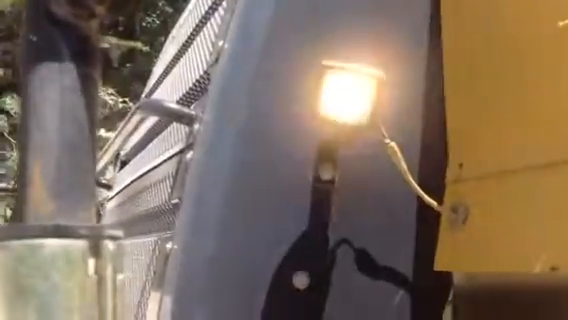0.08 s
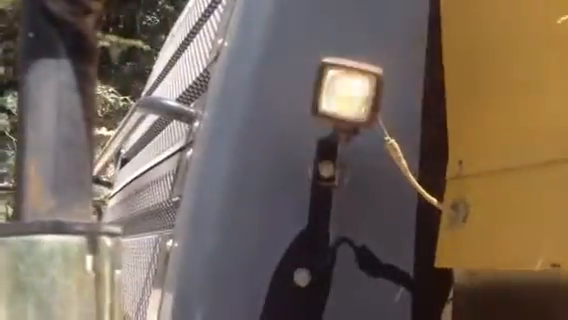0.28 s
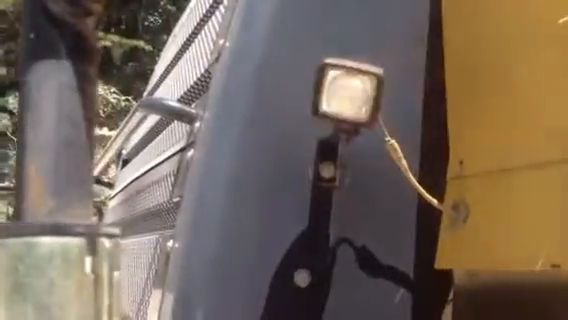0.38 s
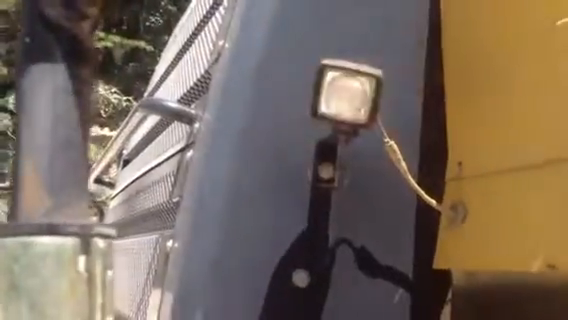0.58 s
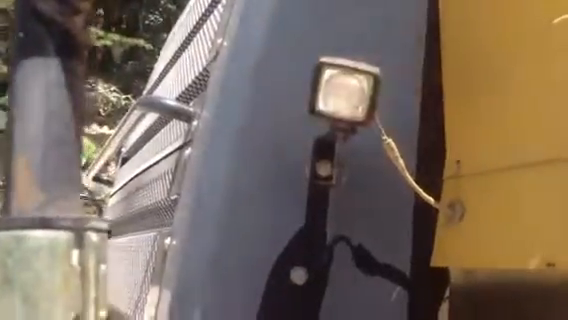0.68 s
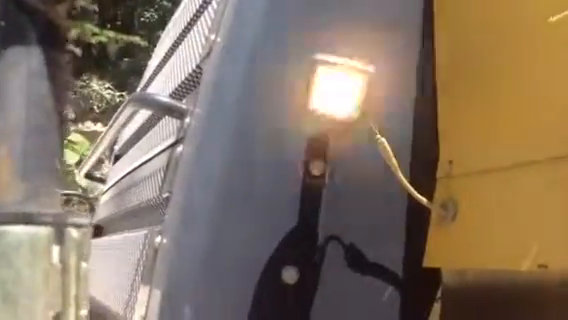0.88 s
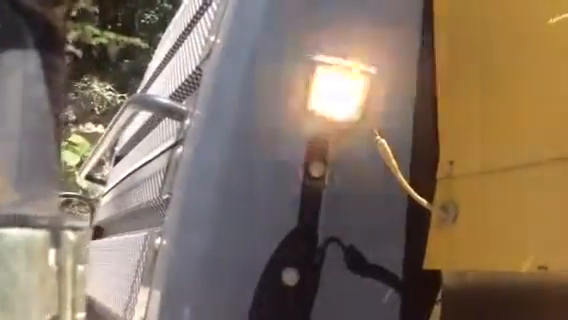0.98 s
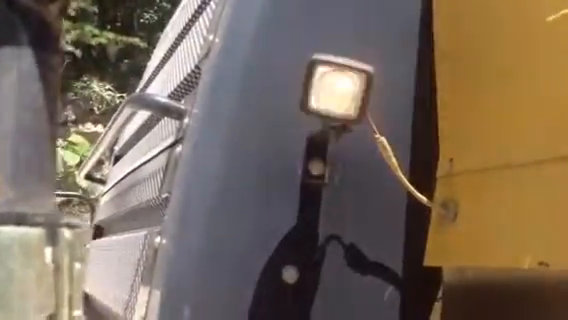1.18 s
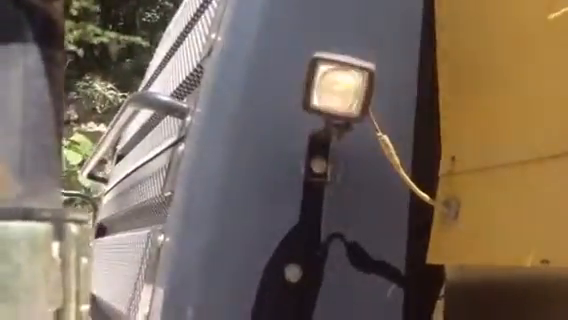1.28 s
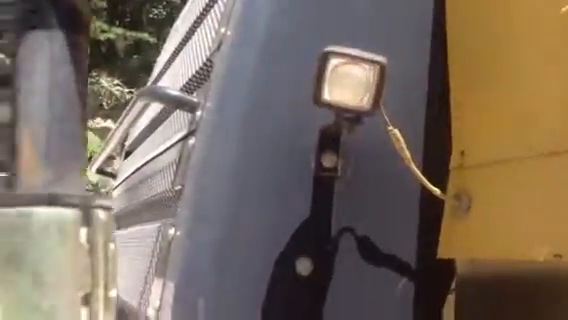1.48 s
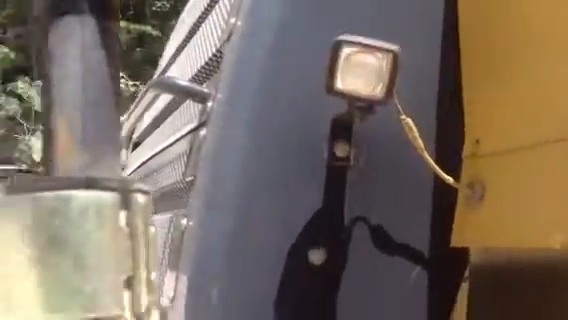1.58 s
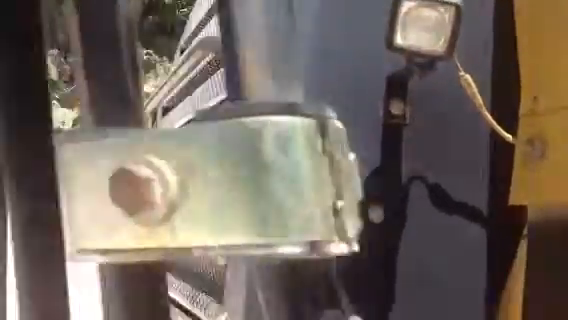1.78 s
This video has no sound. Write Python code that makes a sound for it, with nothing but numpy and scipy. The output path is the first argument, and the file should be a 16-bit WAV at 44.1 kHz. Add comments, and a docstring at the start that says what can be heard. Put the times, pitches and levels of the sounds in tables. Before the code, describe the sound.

Three sharp metallic clacks ring through a truck's steelwork outdoors, followed by soft shoe scuffs

```python
"""Three sharp metallic clacks ring in the steelwork of a big parked truck: its work lamp goes off, on and off.
Each is a noise snap, ringing panels (fading bands of noise), steel modes (fading sines) and a short echo.
Shoes shift softly on the steel steps, mostly afterwards: noise rustle and scuffs, short sines for creak and bumps.
Outdoors, shaped noise gives hissing insects over a low distant rumble; at first a nearer insect rasps
in short bursts of hissing noise with a slight flutter."""
import sys
import numpy as np
from scipy import signal
from scipy.fft import rfft, irfft
from scipy.io import wavfile

SR = 44100
rng = np.random.default_rng(int(sys.argv[2]) if len(sys.argv) > 2 else 0)


def unload_audio(sound):
    """Save the sound as a 16-bit wav file, at the path given as the first command line argument."""
    columns = np.transpose(np.atleast_2d(sound))
    # keep every value between -1 and 1, then stretch to whole-number steps
    steps = np.round(np.clip(columns, -1, 1) * 32767)
    wavfile.write(sys.argv[1], SR, steps.astype(np.int16))


N = 79380
T = np.arange(N) / SR
FREQS = np.maximum(np.fft.rfftfreq(N, 1 / SR), 1)  # kept above 0 so its logarithm exists


def undb(db):
    """Turn decibels into gain."""
    return 10 ** (np.asarray(db) / 20)


def unit(x):
    """Scale to rms 1."""
    return x / np.std(x)


def curve(points):
    """Join (frequency [Hz], value) points by straight lines on a log-frequency axis."""
    hz, value = np.array(points, float).T
    return np.interp(np.log(FREQS), np.log(np.sort(hz)), value)


def tint(x, db):
    """Boost or cut each frequency of a sound by the given decibels."""
    return irfft(rfft(x) * undb(db), N)


def noise(db):
    """Make noise of rms 1 with the given spectrum."""
    return unit(tint(rng.standard_normal(N), db))


def fade(age, t60):
    """Die away by 60 dB in t60 seconds."""
    return np.exp(-np.log(1000) * np.maximum(age, 0) / t60)


def rise(age, length):
    """Ramp from 0 to 1 over the given length."""
    return np.clip(age / length, 0, 1)


# spectrum of the distant rumble and insect chorus: (frequency [Hz], relative level [dB per Hz])
OUTDOORS_SPECTRUM = [(15, -53), (25, -34.5), (156, 3), (368, -8.5), (648, -11), (722, -13.5), (848, -11),
                     (1020, -11.5), (1170, -16.5), (1380, -13), (1620, -17.5), (1750, -13), (2060, -17),
                     (2360, -13), (2770, -16), (3000, -13), (3260, -13.5), (5010, -10), (5580, -12),
                     (6920, -4), (10100, -23.5), (14300, -21.5), (15500, -26.5)]
OUTDOORS_DB, OUTDOORS_WAVER_DB = -62, 0.5  # the waver is an rms value


def outdoors():
    """Far rumble and a smooth insect chorus: steady noise whose level wavers slightly."""
    waver = noise(-40 * np.log10(1 + FREQS / 8))  # mostly slow, below about 8 Hz
    level_db = OUTDOORS_DB + OUTDOORS_WAVER_DB * waver
    return undb(level_db) * noise(curve(OUTDOORS_SPECTRUM))


# bursts of the near insect: (time [s], length before the release [s], level [dB])
RASP_BURSTS = [(-.02, 0.044, -57), (0.041, 0.044, -56.5), (0.105, 0.05, -58.5), (0.177, 0.042, -58),
               (0.253, 0.15, -63)]
# spectrum of its rasp: (frequency [Hz], relative level [dB per Hz])
RASP_SPECTRUM = [(2000, -36), (3000, -7.5), (3800, 1), (5000, 2), (6500, 1), (8100, 0), (9300, -16.5),
                 (14000, -20)]
RASP_ATTACK_S, RASP_RELEASE_S = 0.0018, 0.014
FLUTTER_HZ, FLUTTER_DEPTH = 269, 0.21


def insect():
    """A near insect rasps: short bursts of hissing noise with a slight flutter."""
    bursts = np.zeros(N)
    for start, length, db in RASP_BURSTS:
        age = T - start
        release = np.exp(-np.maximum(age - length, 0) / RASP_RELEASE_S)
        bursts += undb(db) * rise(age, RASP_ATTACK_S) * release
    flutter = 1 + FLUTTER_DEPTH * np.sin(2 * np.pi * FLUTTER_HZ * T)
    return bursts * noise(curve(RASP_SPECTRUM)) * flutter


# spectrum of someone moving softly: (frequency [Hz], relative level [dB per Hz])
SHUFFLE_SPECTRUM = [(100, -49), (230, 10), (400, 3), (700, 2), (1500, -6), (5000, -17.5)]
SHUFFLE_DB, SHUFFLE_S, SHUFFLE_LENGTH_S = -66.5, 1.5, 0.64  # loudest at SHUFFLE_S


def shuffle():
    """A soft rustle of someone moving: noise that swells and sinks once."""
    swell = np.exp(-((T - SHUFFLE_S) / SHUFFLE_LENGTH_S) ** 2)
    return undb(SHUFFLE_DB) * noise(curve(SHUFFLE_SPECTRUM)) * swell


# sole bumps and creak ticks on the step:
# (time [s], level before attack and decay [dB], pitch [Hz], decay to 1/e [s])
STEP_BUMPS = [(1.5121, -31, 2020, 0.00072), (1.5180, -27, 1860, 0.00069), (1.5220, -34, 1820, 0.00081),
              (1.5255, -36, 636, 0.0027), (1.529, -53, 296, 0.004), (1.5543, -44.5, 360, 0.0037),
              (1.7167, -49, 218, 0.0096), (1.790, -50.5, 600, 0.007), (1.7925, -45, 1640, .003)]
BUMP_ATTACK_S = 0.0019


def bumps():
    """A sole creaks and settles on the step: each tick or bump is a quickly damped sine."""
    out = np.zeros(N)
    for start, db, hz, decay in STEP_BUMPS:
        age = np.maximum(T - start, 0)
        envelope = rise(age, BUMP_ATTACK_S) * np.exp(-age / decay)
        out += undb(db) * envelope * np.sin(2 * np.pi * hz * age)
    return out


# scuffs of soles and clothing:
# (time of the loudest point [s], level [dB], time from there to 1/e [s],
#  centre [Hz], distance from the centre to 6 dB down [octaves])
SOLE_SCUFFS = [(0.677, -69, .025, 11500, 0.43), (1.525, -57.5, 0.018, 980, 1.5),
               (1.572, -58, 0.0042, 2000, 1.2), (1.683, -65.5, .008, 8950, .7),
               (1.7133, -54, 0.003, 3960, 1.4), (1.789, -62.5, 0.027, 600, 2),
               (1.794, -53.5, 0.0028, 3200, 0.96)]


def scuffs():
    """Soles and clothing rub: brief puffs of noise, each around one pitch."""
    out = np.zeros(N)
    for when, db, length, hz, octaves in SOLE_SCUFFS:
        rub = noise(-6 * (np.log2(FREQS / hz) / octaves) ** 2)
        out += undb(db) * rub * np.exp(-((T - when) / length) ** 2)
    return out


RIPPLE_DB, RIPPLE_HZ = 3.2, 70  # size, and spacing of the random points


def ripple():
    """Random narrow peaks and gaps, new for each clack, make the noise more tonal (dB at each frequency)."""
    grid = np.arange(0, SR / 2, RIPPLE_HZ)
    heights = np.clip(rng.standard_normal(len(grid)), -2, 1)  # gaps go deeper than peaks go high
    return RIPPLE_DB * np.interp(FREQS, grid, heights)


# how long the panels ring in each band: (band centre [Hz], time to fall by 60 dB [s])
PANEL_RING_TIMES = [(300, 0.096), (900, 0.22), (2000, 0.26), (4000, 0.17), (7500, 0.14), (14000, 0.13)]
PANEL_ATTACK_S, PANEL_HOLD_S = 0.0015, 0.01
BUILD_CYCLES = 2.3  # each band takes this many cycles of its centre pitch to build up


def panel_ring(grain):
    """The panel's crowded resonances build up, treble first, and each band dies away in its own time."""
    centres = [hz for hz, _ in PANEL_RING_TIMES]
    spectrum = rfft(grain)
    out = np.zeros(N)
    for (hz, t60), pick in zip(PANEL_RING_TIMES, np.eye(len(centres))):
        share = curve(list(zip(centres, pick)))  # 1 at this band's centre, 0 at its neighbours
        band = irfft(spectrum * share, N)
        out += band * fade(T - PANEL_HOLD_S, t60) * rise(T, BUILD_CYCLES / hz)
    return out * rise(T, PANEL_ATTACK_S)


# spectrum of the contact: (frequency [Hz], relative level [dB per Hz])
SNAP_SPECTRUM = [(200, -40), (900, -13), (2000, -17), (4000, -2), (7500, 5.5), (10000, -20), (15000, -11)]
SNAP_S = 0.0029  # decay to 1/e


def contact_snap(colour):
    """The contact itself: a very short burst of noise."""
    return tint(noise(curve(SNAP_SPECTRUM)), colour) * np.exp(-T / SNAP_S) * rise(T, PANEL_ATTACK_S)


# ringing modes of the steel, three matching lists: pitch [Hz]
MODE_HZ = [480, 778, 845, 963, 1043, 1104, 1280, 1403, 1462, 1520, 1746, 1798, 1885, 1990, 2130, 2215, 2825,
           2981, 3251, 3650, 3861, 4041, 4311, 4392, 6038, 6138, 6946, 7247, 7486, 8320]
# relative level of each mode [dB]
MODE_DB = [-14.5, -2.5, 1.5, -8.5, -5, -10.5, -6, -7, -10, -4, 5, -2, -1, -7, -2.5, -7, -5, -1.5, -5, 0, 7,
           3.5, 1, 2, 3, 6, 2, -14, 3, 7]
# time for each mode to fall by 60 dB [s]
MODE_T60_S = [0.29, .21, 0.25, 0.56, .52, 0.35, 0.23, 0.53, 0.54, 0.23, 0.21, 0.43, 0.17, .33, .38, 0.34,
              .25, 0.25, .27, 0.26, 0.22, 0.22, 0.069, 0.11, 0.14, .15, 0.14, 0.13, 0.17, 0.12]
MODES_ATTACK_S = 0.0018


def steel_modes(colour):
    """The steel rings at its own pitches: fading sines, each started at a random phase."""
    out = np.zeros(N)
    for hz, db, t60 in zip(MODE_HZ, MODE_DB, MODE_T60_S):
        gain = undb(db + np.interp(hz, FREQS, colour))
        out += gain * fade(T, t60) * np.sin(2 * np.pi * (hz * T + rng.random()))
    return out * rise(T, MODES_ATTACK_S)


# spectrum of the echo off the machine and trees: (frequency [Hz], relative level [dB per Hz])
ECHO_SPECTRUM = [(30, -34), (200, -6.5), (500, -5), (950, -1), (2000, 0.5), (3000, -3), (5000, -36),
                 (8000, -4.5), (15000, -45)]
ECHO_T60_S = 0.47


def echo():
    """Sound comes back off the machine and trees as a soft-edged, fading wash of noise."""
    return noise(curve(ECHO_SPECTRUM)) * fade(T, ECHO_T60_S) * rise(T, 0.018)


# clacks of the switch: (time [s], level [dB], then a boost or cut [dB] at each of COLOUR_POINTS)
SWITCH_CLACKS = [(.2192, -0.14, 1.5, -1.5, 1, 0.055, -0.091, 1, 0.5, 3, 0, 5, 2.5, -0.5, 0.5, 0.43),
                 (.8320, -0.81, -3.5, 2, 0, -0.44, -1.3, -1.7, 4, -8, -2.5, -2.5, -4.5, 0, 2, 0.12),
                 (1.1357, -0.48, 1.5, 0, 0, 1, 1, -1.2, 3.5, -1, -2.5, 0.5, -3.5, -1, 0, 0)]
# where each clack's colour is set: frequency [Hz]
COLOUR_POINTS = [820, 1060, 1450, 1850, 2900, 3700, 4400, 5300, 6000, 6700, 7500, 8300, 10300, 12500]
# spectrum of the dense, short-lived panel resonances: (frequency [Hz], relative level [dB per Hz])
PANEL_SPECTRUM = [(30, -52), (150, -15), (350, -22), (480, -13.5), (660, -11), (790, 7.5), (930, -3.5),
                  (1170, -14), (1350, 0.5), (1620, -7), (1850, 6.5), (2200, -1.5), (2550, -8.5),
                  (2950, -0.5), (3450, -3), (4000, 3), (4400, 0), (4900, -4.5), (5500, -3.5), (6000, 8.5),
                  (6400, -1.5), (7400, 5.5), (8300, 4.5), (9500, -2), (10300, -1.5), (11200, -6.5),
                  (14000, -9.5), (15800, -36)]
PANEL_DB, SNAP_DB, MODES_DB, ECHO_DB = -29, -23.5, -44, -46.5
SAMENESS = 0.9  # share of the panel noise's power that all clacks have in common
CLACK_LOW_HZ = 277  # low cut that keeps the clacks free of low thump


def clacks():
    """Each snap rings the same panels and modes, in its own colour, and leaves a short echo."""
    shared = noise(curve(PANEL_SPECTRUM))
    out = np.zeros(N)
    for start, db, *tone in SWITCH_CLACKS:
        colour = curve(list(zip(COLOUR_POINTS, tone)))
        own = noise(curve(PANEL_SPECTRUM))
        mixed = np.sqrt(SAMENESS) * shared + np.sqrt(1 - SAMENESS) * own
        grain = tint(mixed, colour + ripple())
        hit = undb(PANEL_DB) * panel_ring(grain)
        hit += undb(SNAP_DB) * contact_snap(colour)
        hit += undb(MODES_DB) * steel_modes(colour)
        hit += undb(ECHO_DB) * echo()
        first = int(start * SR)
        out[first:] += undb(db) * hit[:N - first]
    low_cut = signal.butter(2, CLACK_LOW_HZ, "highpass", fs=SR, output="sos")
    return signal.sosfilt(low_cut, out)


def scene():
    """Everything reaches one microphone, alike in both channels."""
    footsteps = shuffle() + bumps() + scuffs()
    mono = outdoors() + insect() + footsteps + clacks()
    return np.tile(mono, (2, 1))


TOP_HZ = 15400


def record(dry):
    """The recorder cuts the top steeply."""
    top_cut = signal.ellip(8, 0.2, 70, TOP_HZ, fs=SR, output="sos")
    return signal.sosfilt(top_cut, dry)


dry = scene()
out = record(dry)
unload_audio(out)
```